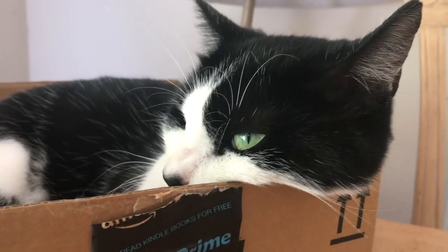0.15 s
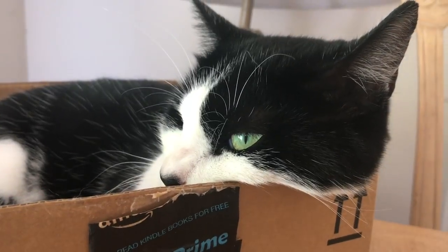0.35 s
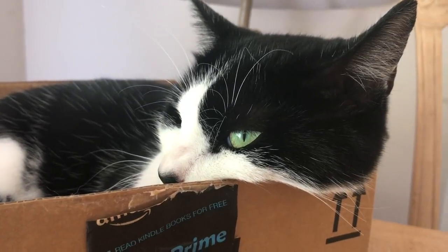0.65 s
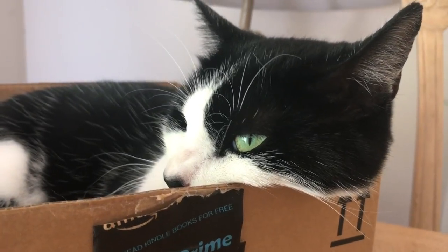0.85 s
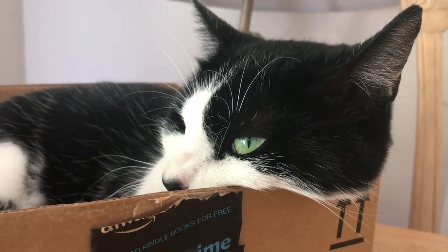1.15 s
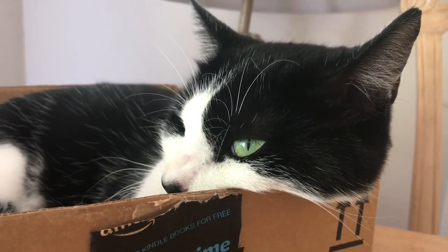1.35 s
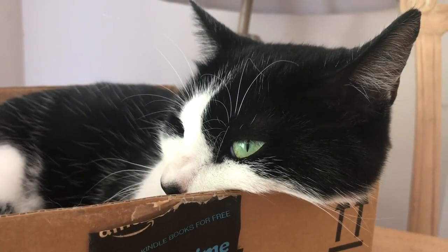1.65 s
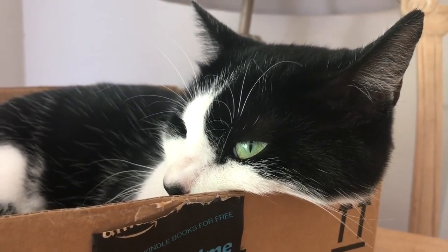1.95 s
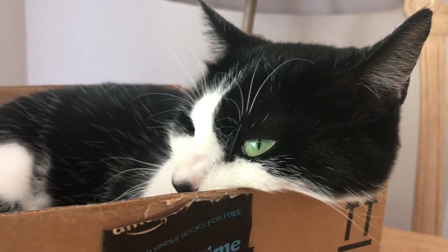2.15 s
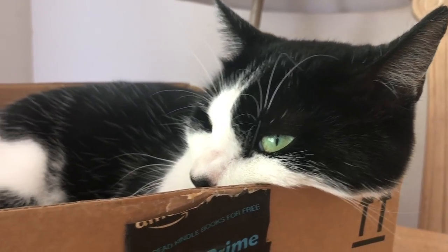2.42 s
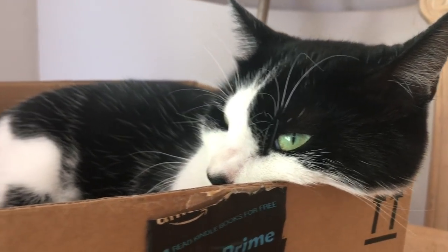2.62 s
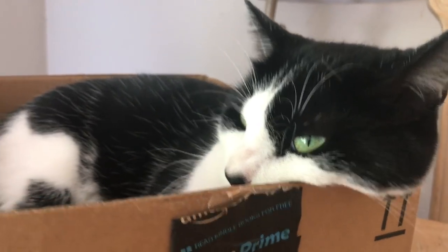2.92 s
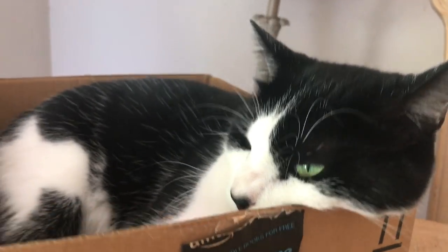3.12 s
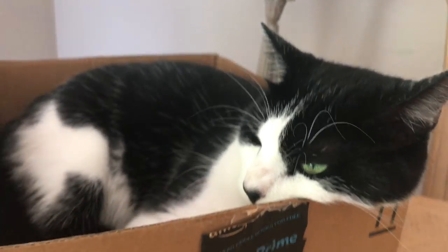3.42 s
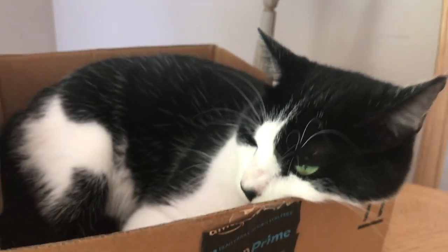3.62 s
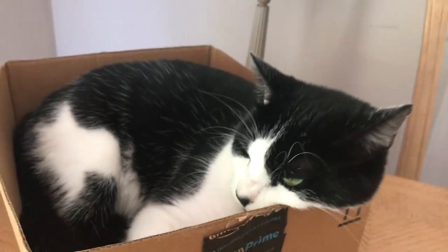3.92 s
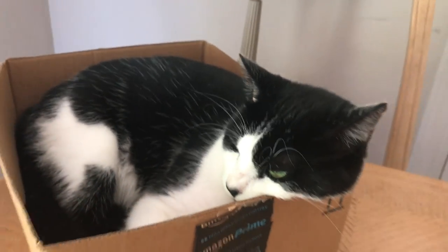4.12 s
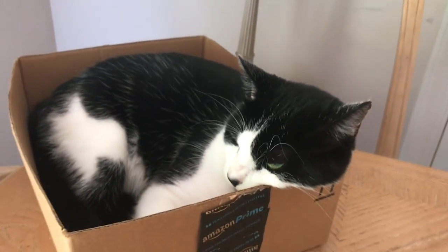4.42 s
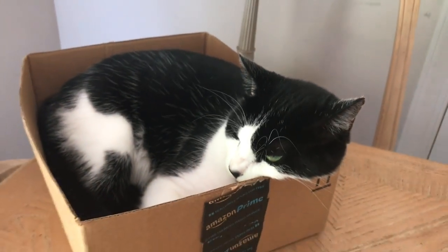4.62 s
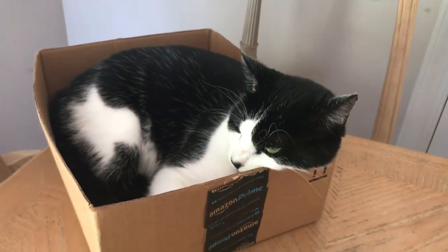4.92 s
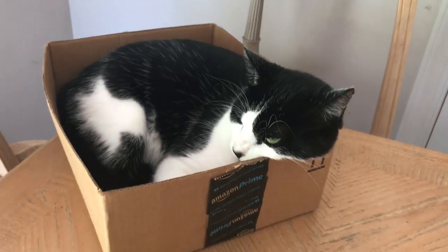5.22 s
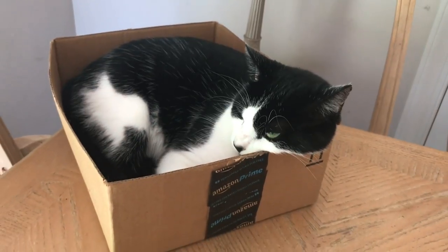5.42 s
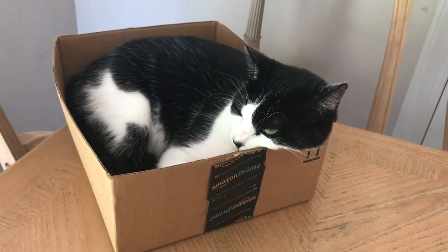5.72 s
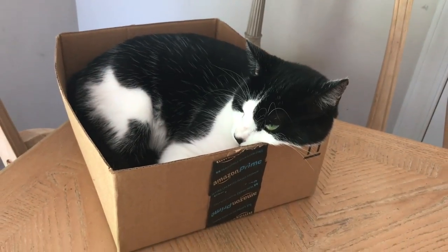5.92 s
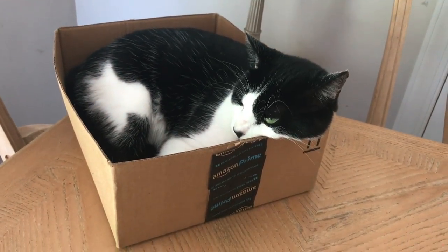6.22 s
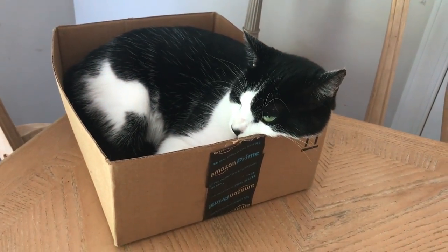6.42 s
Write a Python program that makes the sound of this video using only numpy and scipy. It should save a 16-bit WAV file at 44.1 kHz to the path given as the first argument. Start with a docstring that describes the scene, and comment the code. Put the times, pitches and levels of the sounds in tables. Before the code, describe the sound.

A quiet indoor room with a cat resting in a cardboard box, though no animal sound is heard. Small dry clacks and scuffs come first, then a cluster of soft thumps with a tiny woody creak around 1.4 to 2 seconds. After a sparse pause, a heavy double thud lands near 3.7 seconds and another near 5.6, with cloth rustles between. A faint low hum pulses underneath; one nearby microphone, short room echo.

```python
"""Someone steps and shifts about on a wooden floor in a bare, quiet room.
The boards thump, and creak once: each time a group of fading tones rings, with an echo of noise.
Soles clack and scuff as short bursts of rough noise; clothes rustle as sweeps of high noise.
Two motors in the building hum at nearly the same speed, so the hum beats about 3.5 times a second.
A faint noise of the still room lies under it all."""
import sys
import numpy as np
from scipy import signal
from scipy.fft import rfft, irfft
from scipy.io import wavfile
from scipy.ndimage import uniform_filter1d

SR = 44100
rng = np.random.default_rng(int(sys.argv[2]) if len(sys.argv) > 2 else 0)


def materialize(psi):
    """Save the field psi as 16-bit PCM at rate SR to the path in sys.argv[1].

    A 1-D psi becomes a single channel; in a 2-D psi each row is a channel.
    """
    bounded = np.clip(np.atleast_2d(psi).T, -1, 1)
    quanta = np.round(bounded * 32767).astype(np.int16)
    wavfile.write(sys.argv[1], SR, quanta)


N = 288855
TIME = np.arange(N) / SR   # s
TAIL = np.arange(30000) / SR   # s after a contact begins

# The two motor tones: (slower motor, faster motor), pitch [Hz]
MOTOR_HZ = (55.75, 59.24)
# Their rms before the hum's rise and fall: (slower motor, faster motor), level [dB]
MOTOR_DB = (-56, -51)
# Rise and fall of the hum at the microphone: (time [s], gain [dB])
HUM_GAIN = [(0, -3.5), (2.5, -3), (4.5, -5), (6.55, -8.5)]
# Colour of the still room's noise: (frequency [Hz], relative level per Hz [dB])
AIR_COLOUR = [(20, -25), (32, 3), (50, 13), (80, -9), (120, -2.5), (200, -1.5), (400, -33), (800, -16),
              (1200, -18), (2500, -57), (5000, -49), (6300, -28.5), (10000, -47), (13000, -60),
              (15500, -58)]
AIR_DB = -58.5   # rms

# How long the room rings: (frequency [Hz], time to fall by 60 dB [s])
ROOM_FADE = [(100, 0.59), (260, 0.45), (700, 0.52), (1840, 0.55), (4850, 0.56), (12800, 0.47)]

# Shifts of weight: (time of most effort [s], rumble of the boards [dB], shuffling [dB], build-up [s])
SHIFTS = [(0.09, -65, -64, 0.065), (0.55, -78, -55, 0.17), (0.83, -77.5, -58.5, 0.033),
          (1.23, -58.5, -70.5, 0.088), (1.61, -50.5, -53, 0.065), (1.821, -50.5, -56.5, .08),
          (2.12, -48.5, -66, 0.15), (3.27, -52.5, -65.5, 0.24), (3.52, -51.5, -56, 0.17),
          (3.87, -59, -55, 0.17), (4.5, -46, -58.5, .08), (4.78, -79, -62, 0.3), (5.33, -52.5, -62, 0.21),
          (5.4, -59, -58, 0.052), (5.66, -75, -52, 0.085), (6.0, -60, -59, 0.11), (6.52, -60, -58, 0.34)]
# Colour of the boards' rumble: (frequency [Hz], relative level per Hz [dB])
RUMBLE_COLOUR = [(50, -15), (90, 1), (130, -9.5), (175, 1), (230, -0.5), (330, -9), (500, -16.5),
                 (900, -44)]
# Colour of the shuffling soles: (frequency [Hz], relative level per Hz [dB])
SHUFFLE_COLOUR = [(250, -3.5), (500, 8), (750, 3), (1100, 5), (2600, 0.5), (4500, -6.5), (8000, -18)]
SETTLE_DB_PER_S = 63   # each shift dies away at this rate
# the stir of someone standing nearly still
REST_RUMBLE_DB, REST_SHUFFLE_DB, REST_CLOTH_DB = -64.5, -70, -76

# Sweeps of cloth: (time of the middle [s], level [dB], half length [s])
SWISHES = [(0.01, -66, 0.15), (0.31, -70, .04), (0.933, -64.5, 0.11), (1.422, -59, 0.073),
           (1.774, -70.5, 0.3), (2.693, -68.5, .14), (3.28, -63.5, .06), (3.49, -64, .07),
           (3.71, -60, 0.087), (3.92, -81.5, 0.28), (4.578, -61.5, 0.096), (4.758, -67, 0.091),
           (5.055, -67, 0.083), (5.34, -73, .12), (5.57, -62, 0.1), (6.09, -68, 0.19), (6.42, -58, 0.3)]
# Colour of cloth on cloth: (frequency [Hz], relative level per Hz [dB])
CLOTH_COLOUR = [(1500, -57), (3500, 4), (6000, 4), (8000, 3.5), (10000, 5), (12500, 2), (15500, 0.5)]

# Soles touching the floor: (time [s], clack before the resonances [dB], body over the clack [dB],
# brightness over the clack [dB], ringing pitch [Hz])
SCUFFS = [(0.3909, -53, -2.5, -19, 1120), (0.497, -44, -3.5, -6, 2500), (0.5186, -56, -15, 0.5, 980),
          (0.814, -59.5, -31, -14.5, 1410), (0.9377, -60, -6.5, -13, 1060),
          (1.3535, -50, -6.5, -10.5, 1800), (1.3742, -53, -26, -29, 1810), (1.4405, -53.5, 0.5, 4.5, 1890),
          (1.4976, -56, 0, -12, 1030), (1.6252, -53, -9, -16, 1150), (1.7386, -57, 3.5, -35, 1230),
          (2.0091, -65, 8.5, -19, 990), (2.0972, -69.5, 2, 4, 1010), (2.1647, -60.5, 5, -9, 990),
          (2.431, -73.5, -12, 4, 1060), (2.9864, -67.5, 2, 0, 960), (3.2168, -62.5, 5.5, -9, 1000),
          (3.3298, -62, 5, -5.5, 1570), (3.4029, -53, 1, -11.5, 1150), (3.7219, -43, 1.5, -11, 1630),
          (3.7654, -51.5, 4, -21, 1610), (4.291, -58.5, -5.5, -7, 2330), (4.4063, -57.5, -1, -15, 2700),
          (4.422, -61, 1, -5, 2600), (4.4417, -52.5, 3.5, -7, 1680), (4.6108, -63.5, -5, -9, 1650),
          (5.5871, -48, -0.5, -15, 2020), (5.6045, -50, 7.5, -10, 1940), (5.815, -65, 1.5, 1.5, 1380),
          (5.929, -52.5, -4.5, 1.5, 2500), (5.939, -48.5, -12.5, -2, 1450), (6.0507, -50.5, 1.5, 0.5, 2220)]
# Colour of a sole on wood: (frequency [Hz], relative level per Hz [dB])
SOLE_COLOUR = [(180, -27.5), (300, -3.5), (431, -3), (484, -9), (641, -5), (794, -12.5), (922, -7.5),
               (2070, -13), (2360, -12.5), (4140, -16.5), (4800, -20.5), (6050, -19), (7750, -29.5),
               (12900, -32), (15500, -40.5)]
BRUSH_S, CONTACT_S = 0.006, 0.018   # shortest brush over the floor, then time to come to rest
FLAT_FOOT_SLOWS = 0.6   # a flatter foot has more body and brushes longer: dB of time per dB of body
SCRAPE_DB, SCRAPE_FOLLOWS = -0.5, 0.44   # scrape over the clack; share of the brightness it takes on
# Woodwork that rings faintly with every touch of a sole: (pitch [Hz], lift [dB])
WOODWORK = [(345, 4), (549, 5), (640, 2.5), (940, 3.5), (1275, 2), (1648, 2.5), (2376, 5), (2620, 3)]
WOODWORK_WIDTH_HZ = 19

# Weight landing on the boards, and one small board creak near 1.62 s: (time [s], thump [dB],
# depth [dB], knock [dB], time the load takes to build [s], pitch the boards favour there [Hz])
BOARD_SOUNDS = [(0.497, -58.5, -79, -48.5, 0.014, 320), (1.363, -46, -64, -57, 0.0066, 230),
                (1.437, -43.5, -63, -61, .007, 190), (1.468, -45, -47, -47, .009, 199),
                (1.623, -58, -58, -49, 0.0057, 413.5), (1.734, -52.5, -75, -50.5, .015, 253),
                (1.986, -40.5, -40.5, -49, 0.019, 203), (2.157, -56, -51.5, -62, 0.028, 231),
                (2.654, -52.5, -63, -61, 0.0021, 171), (3.41, -38.5, -51, -55, 0.005, 170),
                (3.709, -25.5, -40, -36, 0.02, 205), (3.757, -31.5, -52, -40.5, 0.005, 169),
                (4.414, -37, -42.5, -53, 0.0044, 168), (5.574, -34.5, -51, -39.5, 0.012, 175),
                (5.599, -29.5, -39.5, -43.5, .008, 175)]
# Ringing tones of floor and room: (pitch [Hz], relative level [dB], time to fall by 60 dB [s])
BOARDS = [(64, -12, 0.4), (84.2, -7.5, 0.58), (112, -3, 0.32), (141, -7, 0.23), (171.2, 2, 0.26),
          (182.7, 3.5, 0.22), (213.5, -1.5, 0.39), (235.3, -6, 0.57), (257.4, -21.5, 0.49),
          (334.7, -9.5, 0.38), (427, -16.5, 0.53), (579, -24.5, 0.74), (619, -35, 0.95)]


def from_db(db):
    """Turn decibels into a plain multiplier."""
    return 10 ** (np.asarray(db) / 20)


def rms_one(x):
    """Scale a sound to rms 1."""
    return x / np.sqrt(np.mean(x ** 2) + 1e-20)


def loudest_one(x, size=1400):
    """Scale so that the loudest stretch, about 30 ms long, has rms 1."""
    return x / np.sqrt(uniform_filter1d(x ** 2, size).max() + 1e-20)


def at_hz(points, hz):
    """Read a table between its points, with pitch spaced evenly by octaves."""
    table_hz, value = np.transpose(points)
    return np.interp(np.log(np.maximum(hz, 1)), np.log(table_hz), value)


def band(x, low_hz, high_hz):
    """Keep only the sound between two frequencies."""
    return signal.sosfilt(signal.butter(3, [low_hz, high_hz], "band", fs=SR, output="sos"), x)


def coloured(x, spectrum):
    """Give a sound the listed spectrum with a minimum-phase filter, so nothing sounds early."""
    size = 8192
    half = size // 2
    wanted = from_db(at_hz(spectrum, np.arange(half + 1) * SR / size))
    # folding the log spectrum's transform forward puts the filter's energy at its start
    cepstrum = irfft(np.log(wanted))
    cepstrum[1:half] *= 2
    cepstrum[half + 1:] = 0
    response = irfft(np.exp(rfft(cepstrum)))
    return signal.oaconvolve(x, response)[:len(x)]


def noise_of(spectrum):
    """Steady noise of the given colour, with rms 1."""
    return rms_one(coloured(rng.standard_normal(N), spectrum))


def grains(count, spread_db):
    """Friction: tiny slips of very unequal size."""
    size_db = spread_db * np.minimum(rng.exponential(1, count), 6)
    return rng.standard_normal(count) * from_db(size_db)


def add(out, s, sound):
    """Mix a sound in at time s."""
    start = max(round(s * SR), 0)
    out[start:start + len(sound)] += sound[:N - start]


def emphasised(x, hz, q, boost_db):
    """Lift the sound around one pitch, or lower it if the boost is negative."""
    b, a = signal.iirpeak(hz, q, fs=SR)
    return x + (from_db(boost_db) - 1) * signal.lfilter(b, a, x)


def balanced(sound, zones):
    """Give each zone (low Hz, high Hz, dB) of a sound its own level."""
    return sum(from_db(db) * loudest_one(band(sound, low, high)) for low, high, db in zones)


def stretch_of(noise):
    """A random piece of a noise, as long as one contact's tail."""
    start = rng.integers(len(noise) - len(TAIL))
    return noise[start:start + len(TAIL)]


def reverberation(pressure, hz):
    """The room stores a contact's energy and leaks it away; gives the echo's height, top 1."""
    keep = from_db(-60 / (SR * at_hz(ROOM_FADE, hz))) ** 2   # share of energy left after one sample
    stored = signal.lfilter([1], [1, -keep], pressure ** 2)
    return np.sqrt(stored / stored.max())


def near_surfaces(x, strength, reach_s, count=5):
    """Early echoes off nearby furniture give each contact its own ripple in the spectrum."""
    out = x.copy()
    lags = (rng.uniform(0.1, 1, count) * reach_s * SR).astype(int) + 1
    for lag in lags:
        out[lag:] += strength * rng.choice([-1, 1]) * x[:-lag]
    return out / np.sqrt(1 + count * strength ** 2)


def background():
    """Two motor tones drift in and out of step, so their sum swells and sinks over the room's noise."""
    slow, fast = (from_db(db) * np.sqrt(2) * np.sin(2 * np.pi * hz * TIME)
                  for hz, db in zip(MOTOR_HZ, MOTOR_DB))
    gain_s, gain_db = np.transpose(HUM_GAIN)
    hum = (slow - fast) * from_db(np.interp(TIME, gain_s, gain_db))
    return hum + from_db(AIR_DB) * noise_of(AIR_COLOUR)


def clothes():
    """Cloth slides over cloth in sweeps that swell and fade evenly."""
    sliding = from_db(REST_CLOTH_DB)
    for s, db, half_length in SWISHES:
        sweep = np.exp(-((TIME - s) / half_length) ** 2)
        sliding = np.hypot(sliding, from_db(db) * sweep)
    return sliding * rms_one(coloured(grains(N, spread_db=3.0), CLOTH_COLOUR))


def movement():
    """Each shift of weight builds up and settles; it stirs the boards and makes the soles rub."""
    rumble, shuffle = from_db(REST_RUMBLE_DB), from_db(REST_SHUFFLE_DB)
    for s, rumble_db, shuffle_db, build_up in SHIFTS:
        rise = np.exp(-(np.minimum(TIME - s, 0) / build_up) ** 2)
        settling = from_db(-SETTLE_DB_PER_S * np.maximum(TIME - s, 0))
        effort = rise * settling
        rumble = np.hypot(rumble, from_db(rumble_db) * effort)
        shuffle = np.hypot(shuffle, from_db(shuffle_db) * effort)
    rubbing = rms_one(coloured(grains(N, spread_db=2.0), SHUFFLE_COLOUR))
    return rumble * noise_of(RUMBLE_COLOUR) + shuffle * rubbing


def woodwork(x):
    """Narrow resonances of the furniture colour the touches of the soles."""
    for hz, lift_db in WOODWORK:
        x = emphasised(x, hz, q=hz / WOODWORK_WIDTH_HZ, boost_db=lift_db)
    return x


def scuffs(ring_db=4.0, direct_db=-3):
    """A sole meets the floor as a short cluster of slips, followed by a wash of reflections."""
    edges_hz = (320, 1150, 3250, 7200, 17000)   # bounds of body, clack, scrape and brightness
    zones = list(zip(edges_hz, edges_hz[1:]))
    slips = coloured(grains(N, spread_db=3.5), SOLE_COLOUR)
    wash = coloured(rng.standard_normal(N), SOLE_COLOUR)
    slip_zones = [rms_one(band(slips, low, high)) for low, high in zones]
    wash_zones = [rms_one(band(wash, low, high)) for low, high in zones]
    out = np.zeros(N)
    for s, clack, body, brightness, ring_hz in SCUFFS:
        brush = BRUSH_S * from_db(FLAT_FOOT_SLOWS * max(body, 0))
        bearing_down = np.minimum(TAIL / brush, 1) ** 2
        coming_to_rest = np.exp(-2 * np.maximum(TAIL - brush, 0) / CONTACT_S)
        pressure = bearing_down * coming_to_rest + 1e-9
        # a brighter touch also scrapes more
        scrape = SCRAPE_DB + SCRAPE_FOLLOWS * brightness
        gains = from_db(clack + np.array([body, 0, scrape, brightness]))
        heard = np.zeros(len(TAIL))
        for gain, near, far, (low, high) in zip(gains, slip_zones, wash_zones, zones):
            direct = from_db(direct_db) * pressure * stretch_of(near)
            reflected = reverberation(pressure, np.sqrt(low * high)) * stretch_of(far)
            heard += gain * (direct + reflected)
        heard = near_surfaces(heard, strength=0.2, reach_s=0.007)
        # start early, so that the brush ends at the listed time
        add(out, s - brush, emphasised(heard, ring_hz, q=5, boost_db=ring_db))
    return out


def thumps_and_creak(echo_db=-6, uneven_db=1.5, favour_db=2, favour_octaves=0.16):
    """As a load builds on the boards, their tones swell, ring out and echo in the room."""
    out = np.zeros(N)
    diffuse = noise_of(RUMBLE_COLOUR)
    hz, tone_db, fade_s = np.transpose(BOARDS)
    # spinning, shrinking numbers: their real part is a fading tone
    tones = np.exp(np.outer(2j * np.pi * hz - np.log(1000) / fade_s, TAIL))
    for s, thump, depth, knock, build_s, favoured_hz in BOARD_SOUNDS:
        # the place on the floor decides which tones answer best
        place_db = favour_db * np.exp(-(np.log2(hz / favoured_hz) / favour_octaves) ** 2)
        strength = from_db(tone_db + place_db + uneven_db * rng.standard_normal(len(hz)))
        phase = np.exp(2j * np.pi * rng.random(len(hz)))
        load = 1 - np.exp(-(TAIL / build_s) ** 2)
        ringing = load * ((strength * phase) @ tones).real
        # the room answers the change of load
        echo = stretch_of(diffuse) * reverberation(np.gradient(load), favoured_hz)
        heard = loudest_one(ringing) + from_db(echo_db) * echo
        zones = ((53.3, 94.4, depth), (127.7, 264, thump), (291.5, 680, knock))
        add(out, s, balanced(heard, zones))
    return out


def scene():
    """Everything at one microphone."""
    floor = thumps_and_creak() + woodwork(scuffs())
    return (floor + movement() + clothes() + background())[None]


def record(dry, low_cut_hz=45, dip_hz=10300, dip_db=-3, top_cut_hz=15750):
    """The microphone sheds the deep bass, dips a little in the high treble and cuts off the top."""
    thinned = signal.sosfilt(signal.butter(4, low_cut_hz, "high", fs=SR, output="sos"), dry)
    dipped = emphasised(thinned, dip_hz, q=6.6, boost_db=dip_db)
    return signal.sosfilt(signal.ellip(12, 0.1, 80, top_cut_hz, fs=SR, output="sos"), dipped)


dry = scene()
out = record(dry)
materialize(out)
```